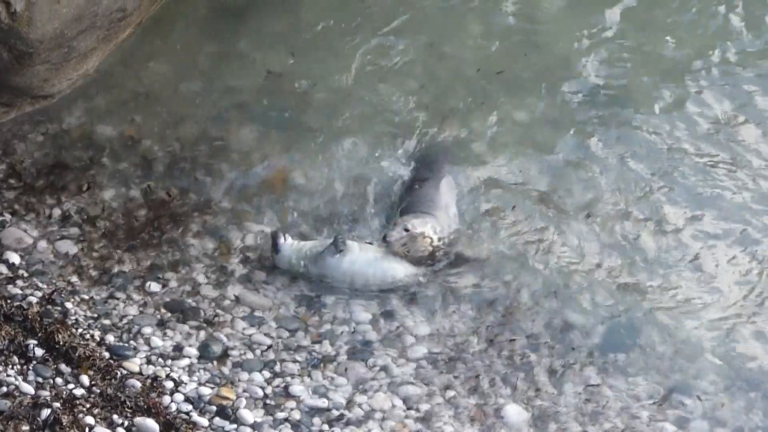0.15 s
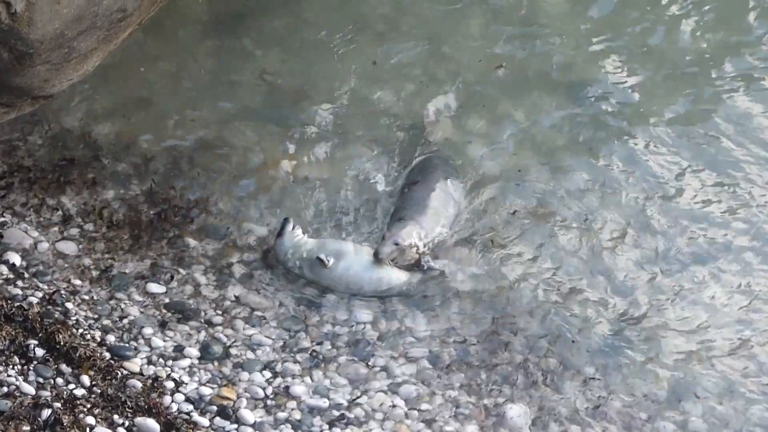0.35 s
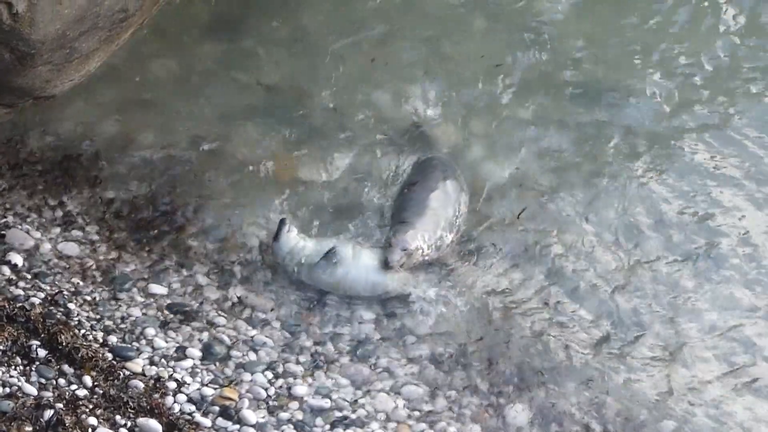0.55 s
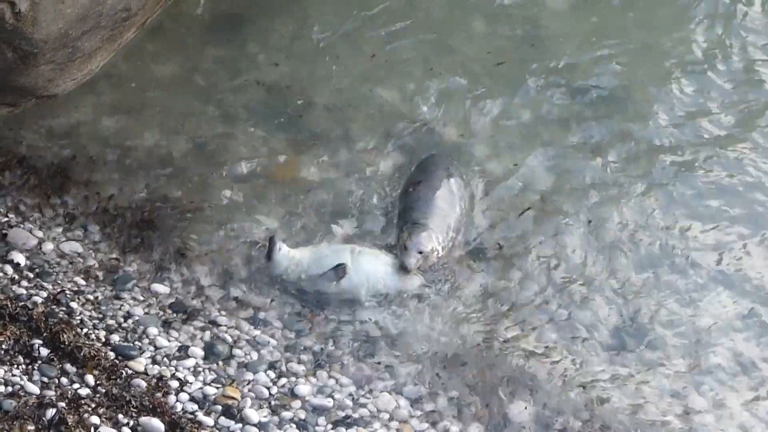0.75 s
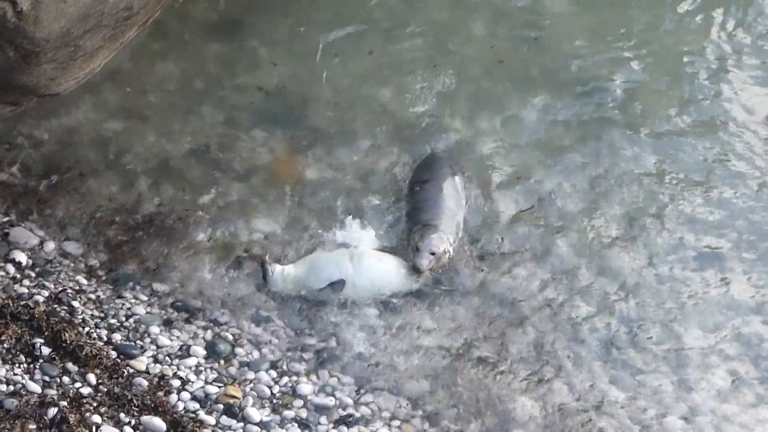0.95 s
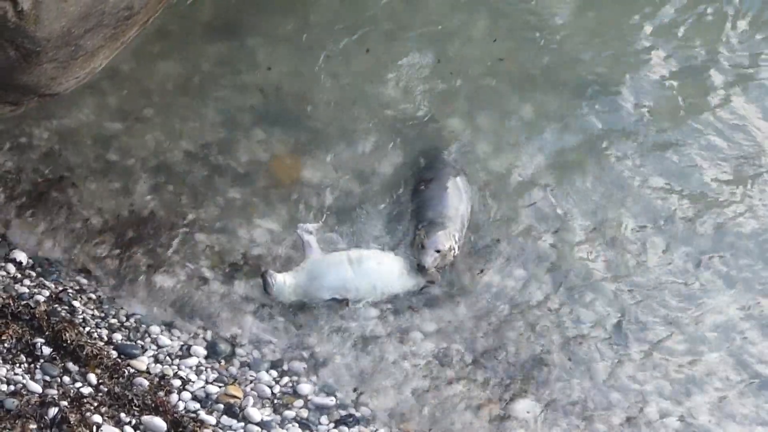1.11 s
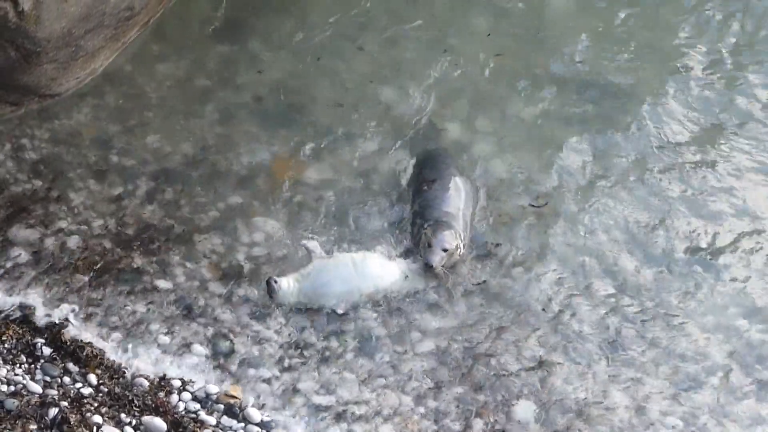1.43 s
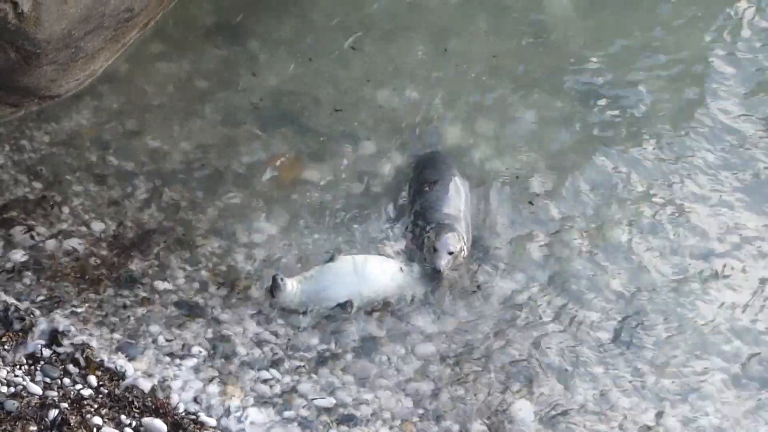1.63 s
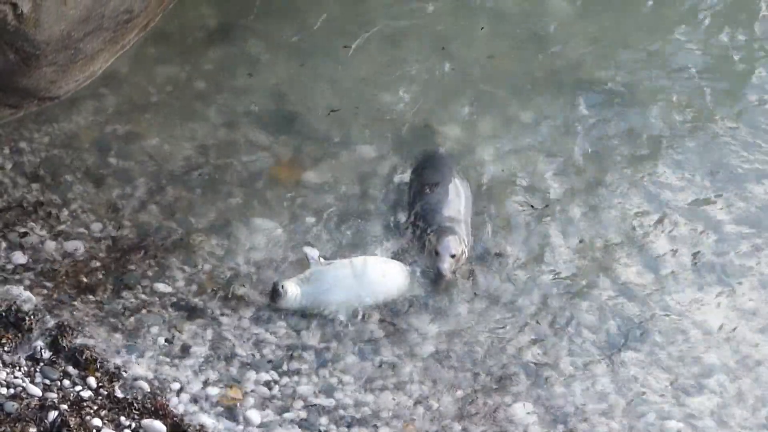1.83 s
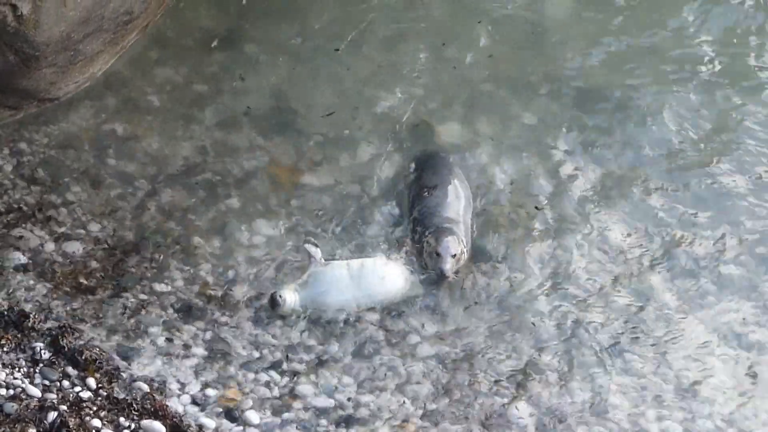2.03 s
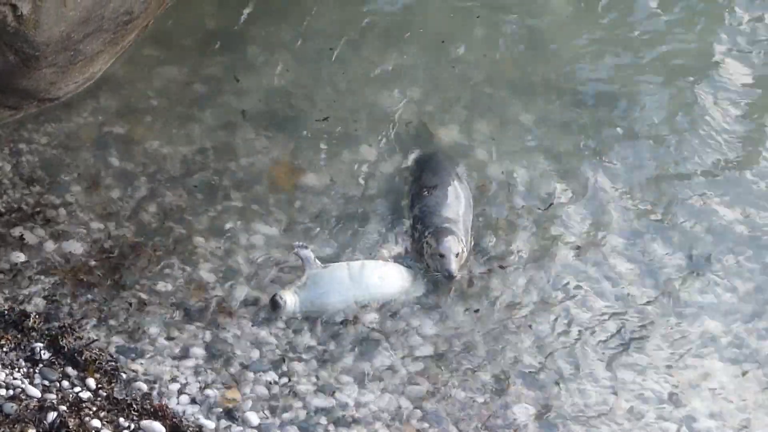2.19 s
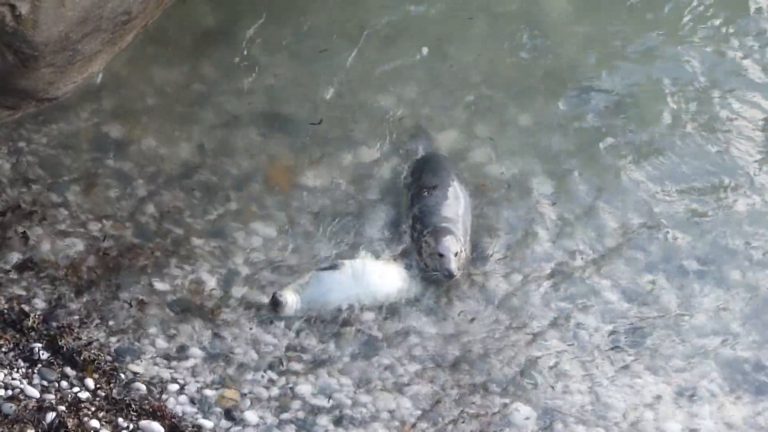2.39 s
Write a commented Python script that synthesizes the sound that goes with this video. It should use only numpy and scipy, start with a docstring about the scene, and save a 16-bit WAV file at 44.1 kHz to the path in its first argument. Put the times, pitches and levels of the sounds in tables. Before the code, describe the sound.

Gentle hiss of shallow water on pebbles, with loud wind rumble striking the microphone early on

```python
"""Small waves wash over a pebble shore some way below the microphones: a wide, nearly smooth hiss that swells
and brightens, made of shaped random spectra, with faint pebble ticks (tiny grains) and a short bright rattle.
Wind strikes the two microphone ports close by: buffets are short bursts of a few low cycles, eddies are low
noise in lumps that follow two gusts, and snaps are sharp cycles of opposite sign at the two ports."""
import sys
import numpy as np
from scipy import signal
from scipy.fft import rfft, irfft
from scipy.io import wavfile
from scipy.ndimage import uniform_filter1d

SR = 44100
rng = np.random.default_rng(int(sys.argv[2]) if len(sys.argv) > 2 else 0)


def generate_wav(signal):
    """Clip the signal to [-1, 1] and save it as 16-bit WAV at the path in sys.argv[1]."""
    frames = np.transpose(np.atleast_2d(signal))
    scaled = np.clip(frames, -1, 1) * 32767
    pcm = np.round(scaled).astype(np.int16)
    wavfile.write(sys.argv[1], SR, pcm)


N = 112454  # length in samples, about 2.55 s


def gain_of(db):
    """Amplitude ratio of a level in dB."""
    return 10 ** (np.asarray(db) / 20)


def evened(x):
    """Scales a signal to an RMS of one, over all its ports together."""
    return x / np.sqrt(np.mean(x ** 2) + 1e-20)


def read(points, hz):
    """Reads a curve of (Hz, value) points along a logarithmic pitch axis."""
    point_hz, value = np.transpose(points)
    return np.interp(np.log(hz + 1), np.log(point_hz + 1), value)


def follow(rows, t):
    """Every column of a curve at the times t."""
    columns = np.transpose(rows)
    return [np.interp(t, columns[0], column) for column in columns[1:]]


def add(mix, s, sound):
    """Adds a sound of one or two ports centred on s seconds."""
    first = round(s * SR) - sound.shape[1] // 2
    mix[:, first:first + sound.shape[1]] += sound


def wavelet(hz, spread_s, phase, stretch=1):
    """A tone under a bell-shaped envelope whose tail may be longer than its rise, as a complex turn."""
    t = np.arange(-1500, 1500) / SR
    side_stretch = np.where(t > 0, stretch, 1)
    return np.exp(-.5 * (t / spread_s / side_stretch) ** 2 + 1j * (2 * np.pi * hz * t + phase))


# The waves coming and going below the microphones.
# Each row: time in seconds, body level in dB before WASH_LIFT_DB, treble and low wash against the body in dB.
WAVE_SWELL = [(0, -48.5, -4.5, 6.5), (.25, -44.5, -12, -1.5), (.4, -52, 0.5, 7.5), (.7, -45, -9.5, 0.5),
              (.8, -45, -1, 1), (.93, -43, -3.5, 3.5), (1.18, -45, -3, 6.5), (1.45, -39, -8.5, -4),
              (1.75, -45, -1, 4.5), (2.1, -47, -2, 6), (2.25, -43.5, -10, 0), (2.55, -45.5, -6, 4.5)]
# Colour of the wash on the pebbles. Each row: frequency in Hz, relative density in dB per Hz.
WASH_COLOUR = [(70, -27), (200, -3), (450, 0.5), (900, -4), (1300, -8), (2400, -8), (3300, -12),
               (4000, -18), (6400, -24), (8000, -32.5), (10000, -31), (11300, -37.5), (13000, -43),
               (15500, -51.5)]
# How alike the wash is at the two ports. Each row: frequency in Hz, likeness from 0 to 1.
PORT_LIKENESS = [(180, 0.98), (550, 1), (1650, 0.73), (4970, 0.94), (15000, 0.85)]
# Phase turn of the right port. Each row: frequency in Hz, phase in radians.
PORT_LEAD = [(200, -0.064), (1800, 0.33), (7000, 0.33)]
# Lean of the wash to one port. Each row: frequency in Hz, left minus right in dB.
PORT_LEAN = [(100, 1), (1100, -3), (3000, -1)]
WASH_LIFT_DB, TREBLE_REST_DB = 6.5, -14.5  # lift of wash and ticks; treble column that leaves the colour as is
LOW_HZ, HIGH_HZ = 1110, 4470  # corners of the low wash and of the treble
PATCHY_DB, FLICKER_DB = 0.93, 0.67  # RMS of the drifting patches, and of the flicker above the low wash


def wash():
    """Random short-time spectra with drifting patches; treble and low wash follow the swell by their own amounts."""
    frames = N // 256 + 5
    hz = np.fft.rfftfreq(1024, 1 / SR)[:, None]
    a, b, c, d, patches = rng.standard_normal((frames, 513, 5)).T
    patches = uniform_filter1d(patches, size=14, axis=0)  # smooth over frequency
    patches = evened(uniform_filter1d(patches, size=10, axis=1))  # and over time
    flicker = evened(uniform_filter1d(rng.standard_normal(frames), size=2))
    _, treble, low = follow(WAVE_SWELL, np.arange(frames) * 256 / SR)
    high_share = 1 / (1 + (HIGH_HZ / (hz + 1)) ** 2)
    low_share = 1 / (1 + (hz / LOW_HZ) ** 2)

    same = np.clip(read(PORT_LIKENESS, hz), -1, 1)
    left = a + 1j * b
    right = same * left + np.sqrt(1 - same ** 2) * (c + 1j * d)
    right = right * np.exp(1j * read(PORT_LEAD, hz))
    lean = gain_of(read(PORT_LEAN, hz) / 2)
    spectra = np.array([left * lean, right / lean])

    level_db = read(WASH_COLOUR, hz) + PATCHY_DB * patches
    level_db = level_db + (1 - low_share) * FLICKER_DB * flicker
    level_db = level_db + high_share * (treble - TREBLE_REST_DB) + low_share * low
    _, hiss = signal.istft(spectra * gain_of(level_db), nperseg=1024, noverlap=768)
    return evened(hiss[:, :N])


TICKS_PER_S, TICKS_DB = 590, -20  # over all pitches; level against the wash
TICK_SPREAD_DB = 4.5  # how far the large grains stand out
TICK_LOW_HZ, TICK_HIGH_HZ, TICK_CYCLES = 2270, 14400, 3.3
TICK_TILT_DB = 9.5  # per octave, over the colour of the wash


def ticks():
    """Pebbles click and foam bursts: tiny grains of many pitches, a few of them large."""
    out = np.zeros((2, N))
    for hz in np.geomspace(TICK_LOW_HZ, TICK_HIGH_HZ, 16):
        draw, big, side = rng.random((N, 3)).T
        struck = draw < TICKS_PER_S / 16 / SR
        size_db = -TICK_SPREAD_DB * np.log(big + 0.0061)  # rarely far above the rest
        colour_db = read(WASH_COLOUR, hz) + TICK_TILT_DB * np.log2(hz)
        train = struck * gain_of(size_db + colour_db)
        ports = np.array([.5 + side / 2, 1 - side / 2])
        grain = wavelet(hz, TICK_CYCLES / hz / 2, 0).real[1200:1800]
        out += signal.oaconvolve(train * ports, grain[None], "same")
    return gain_of(TICKS_DB) * evened(out)


# A short bright rattle of pebbles. Each row: centre in seconds, level in dB.
PEBBLE_RATTLES = [(1.754, -44)]
RATTLE_S, RATTLE_HZ, RATTLE_WIDTH_HZ = 0.0027, 8700, 8000  # bell spread, band centre, band width


def rattles():
    """A few milliseconds of bright noise, the same at both ports."""
    out = np.zeros((2, N))
    edges_hz = [RATTLE_HZ - RATTLE_WIDTH_HZ / 2, RATTLE_HZ + RATTLE_WIDTH_HZ / 2]
    band = signal.butter(2, edges_hz, "band", fs=SR)
    for s, db in PEBBLE_RATTLES:
        noise = uniform_filter1d(rng.standard_normal(3000), size=3)
        hiss = evened(signal.lfilter(*band, noise))
        envelope = abs(wavelet(0, RATTLE_S, 0))
        add(out, s, gain_of(db) * envelope * np.array([hiss, hiss]))
    return out


# Single thumps of air at the microphone, one list for the left port and one for the right.
# Each row: centre in seconds, level in dB, pitch in Hz.
PORT_BUFFETS = [
    [(.196, -17.5, 183), (.221, -12, 207), (.242, -18, 186), (.261, -12.5, 222), (.276, -14, 206),
     (.333, -11, 186), (.362, -23, 188), (.389, -11, 175), (.408, -13, 230), (.43, -11, 178),
     (.454, -11.5, 184), (.474, -8.5, 175), (.494, -14, 180), (.514, -17, 153), (.534, -14, 149),
     (.549, -17.5, 172), (.572, -14.5, 161), (.59, -21, 238), (.602, -23, 160), (.625, -22.5, 164),
     (.65, -23, 157), (.696, -21, 270), (.781, -15, 160), (.826, -28.5, 199), (.948, -26, 156),
     (2.199, -21.5, 213), (2.21, -14, 233), (2.22, -15, 267), (2.233, -20, 200), (2.249, -23, 170)],
    [(.22, -9, 228), (.265, -5, 267), (.298, -6, 195), (.308, -12.5, 520), (.314, -6, 283),
     (.326, -8.5, 210), (.344, -9.5, 215), (.359, -6, 205), (.372, -7, 230), (.387, -7.5, 234),
     (.403, -8, 308), (.428, -3, 202), (.438, -20, 180), (.474, -9.5, 198), (.484, -10, 213),
     (.551, -14, 332), (.558, -20, 209), (.645, -14.5, 185), (.657, -15.5, 263), (.673, -15.5, 270),
     (.727, -25, 204), (.764, -18.5, 220), (2.2195, -12.5, 256), (2.2265, -14, 184), (2.255, -23, 200),
     (2.292, -16, 192)],
]
BUFFET_CYCLES, BUFFET_OVERTONE = 0.58, 0.13  # bell spread; share of the octave that points the crests
CREST_SLIP, CREST_LAG, TAIL_STRETCH = 0.65, 1.34, 1.08  # random radians, fixed radians, ratio of tail to rise
LEAK_DB = -14.5  # from each port to the other


def buffets():
    """A few cycles of pressure with pointed crests at one port; a little leaks to the other."""
    out = np.zeros((2, N))
    for port, rows in enumerate(PORT_BUFFETS):
        chances = rng.standard_normal(len(rows))
        for (s, db, hz), chance in zip(rows, chances):
            phase = CREST_SLIP * chance - CREST_LAG
            turns = wavelet(hz, BUFFET_CYCLES / hz, phase, TAIL_STRETCH)
            pressure = (turns + BUFFET_OVERTONE * turns ** 2).real
            add(out[port:port + 1], s, gain_of(db) * pressure[None])
    return out + gain_of(LEAK_DB) * out[::-1]


# Gusts over the microphone, one list each, carrying the smaller random eddies.
# Each row: time in seconds, left level and right level in dB before EDDY_DB.
GUST_LEVELS = [
    [(0, -42, -58), (.05, -51, -34), (.13, -53, -63), (.2, -31, -43), (.28, -27.5, -20),
     (.45, -26.5, -18.5), (.6, -30.5, -36.5), (.78, -35.5, -28), (.8, -47, -45), (.87, -48, -41),
     (.95, -36, -42), (1.06, -39.5, -44), (1.2, -60, -76)],
    [(2.15, -59, -50), (2.21, -30, -29), (2.3, -41, -27.5), (2.33, -57, -65), (2.49, -67, -51),
     (2.55, -56, -57)],
]
# Colour of the eddies. Each row: frequency in Hz, relative density in dB per Hz.
EDDY_COLOUR = [(30, -21), (100, 6.5), (190, -1.5), (300, -7.5), (480, -16), (800, -30.5), (2000, -65)]
EDDY_DB, LUMPY_DB, LUMP_S = 2.5, 4, 0.018  # lift of all gusts; RMS and decay time of the lumps
EDDY_SAME = 0.46  # likeness of the two ports, from 0 to 1


def eddies():
    """Low noise in quick lumps, partly shared by the ports, under the gusts."""
    a, b = rng.standard_normal((N, 2)).T
    ports = np.array([a, EDDY_SAME * a + np.sqrt(1 - EDDY_SAME ** 2) * b])
    colour = gain_of(read(EDDY_COLOUR, np.fft.rfftfreq(N, 1 / SR)))
    air = evened(irfft(rfft(ports) * colour, N))

    decay = np.exp(-1 / (LUMP_S * SR))
    drift = signal.lfilter([1], [1, -decay], rng.standard_normal((N, 2)).T)
    drift = evened(uniform_filter1d(drift, size=200))
    lumps = evened(gain_of(LUMPY_DB * drift))

    t = np.arange(N) / SR
    gusts = np.zeros((2, N))
    for rows in GUST_LEVELS:
        level_db = EDDY_DB + np.array(follow(rows, t))
        during = (t >= rows[0][0]) * (t <= rows[-1][0])
        gusts += during * gain_of(level_db)
    return gusts * lumps * air


# Sharp snaps of air that push the two ports in opposite ways.
# Each row: centre in seconds, left level and right level in dB, pitch in Hz.
AIR_SNAPS = [(.259, -23, -16.5, 970), (.296, -23, -17.5, 690), (.314, -19.5, -15, 1210),
             (.553, -24, -30, 720), (.587, -22, -30, 840)]
SNAP_CYCLES = 0.7  # bell spread


def snaps():
    """One sharp cycle of pressure, of opposite sign at the two ports."""
    out = np.zeros((2, N))
    for s, left_db, right_db, hz in AIR_SNAPS:
        cycle = wavelet(hz, SNAP_CYCLES / hz, 0).real
        add(out, s, gain_of([[left_db], [right_db]]) * [[-1], [1]] * cycle)
    return out


def scene():
    """The shore rises and falls with the swell; the wind at the ports is added to it."""
    body_db = follow(WAVE_SWELL, np.arange(N) / SR)[0]
    shore = gain_of(body_db + WASH_LIFT_DB) * (wash() + ticks())
    return shore + rattles() + buffets() + eddies() + snaps()


WIND_CUT_HZ, EDGE_HZ = 112.6, 15560  # lower and upper limit of the microphone chain
KNEE_DB, SQUEEZE, RECOVER_DB_PER_S = -17.5, 0.31, 50  # SQUEEZE: dB taken off per dB above the knee


def record(dry):
    """A low cut against wind, gain control that ducks a little when loud, then the band limit."""
    low_cut = signal.butter(3, WIND_CUT_HZ, "high", fs=SR, output="sos")
    cut = signal.sosfilt(low_cut, dry)
    power = abs(uniform_filter1d((cut ** 2).mean(0), size=1500))
    power_db = 10 * np.log10(power + 1e-12)
    fall_db = np.arange(N) * RECOVER_DB_PER_S / SR
    held_db = np.maximum.accumulate(power_db + fall_db) - fall_db  # peaks sink at a steady rate
    over_db = np.maximum(held_db - KNEE_DB, 0)
    ducked = cut / gain_of(SQUEEZE * uniform_filter1d(over_db, size=400))
    band_limit = signal.firwin(1023, EDGE_HZ, window=("kaiser", 9), fs=SR)
    return signal.oaconvolve(ducked, band_limit[None], "same")


dry = scene()
out = record(dry)
generate_wav(out)
```